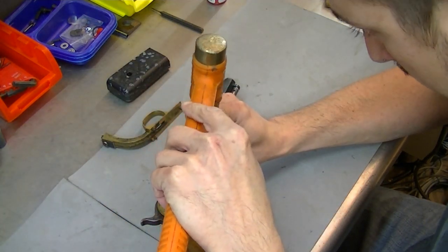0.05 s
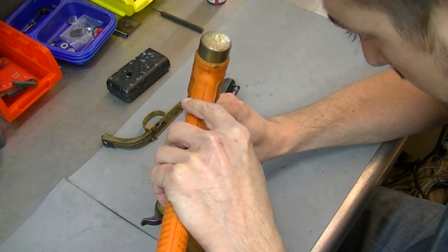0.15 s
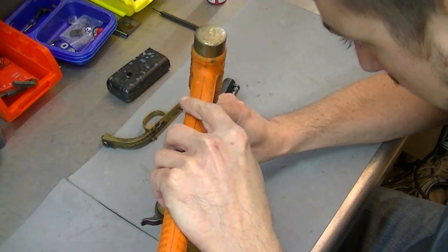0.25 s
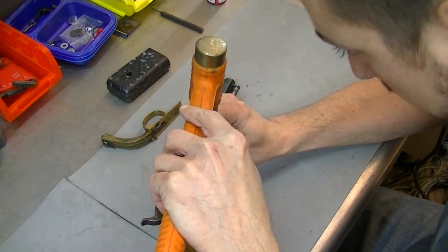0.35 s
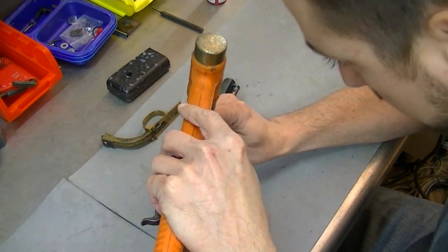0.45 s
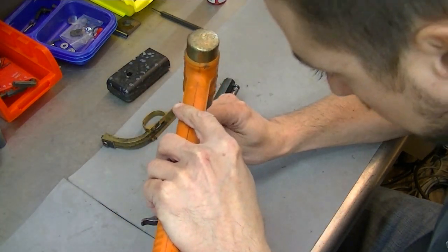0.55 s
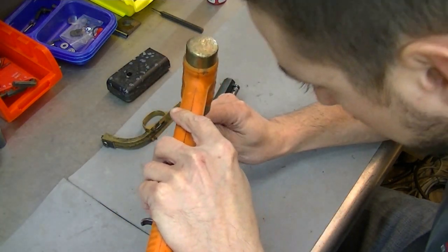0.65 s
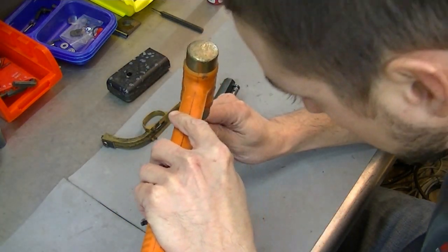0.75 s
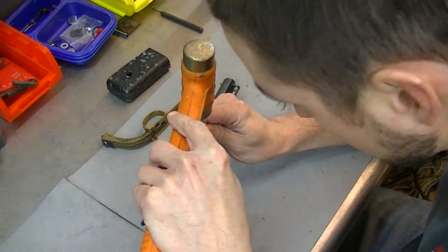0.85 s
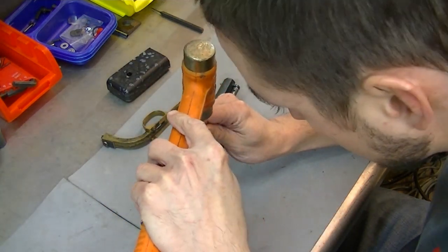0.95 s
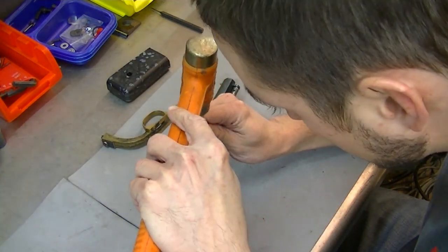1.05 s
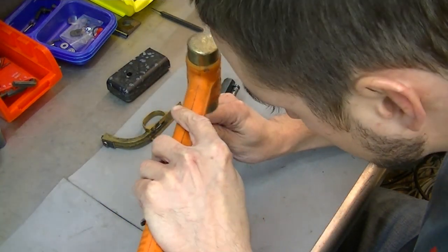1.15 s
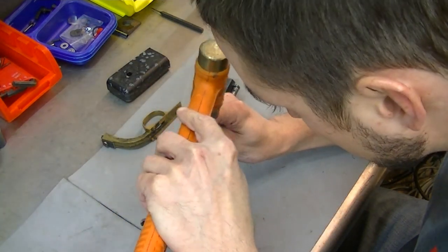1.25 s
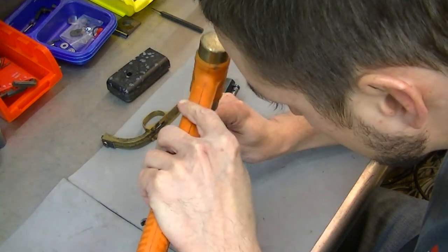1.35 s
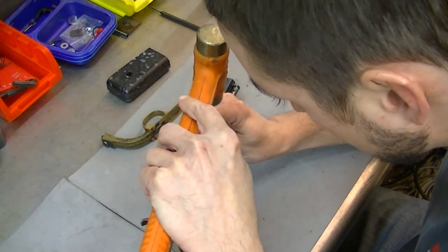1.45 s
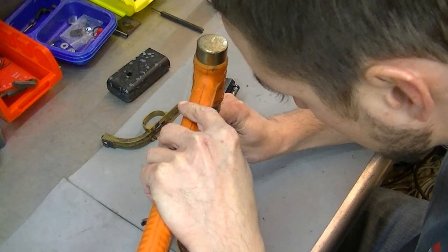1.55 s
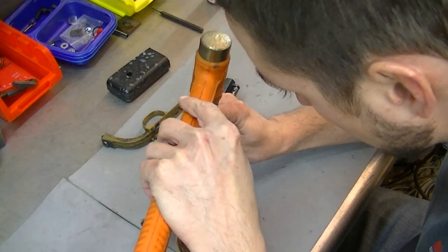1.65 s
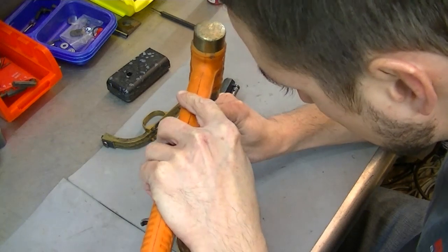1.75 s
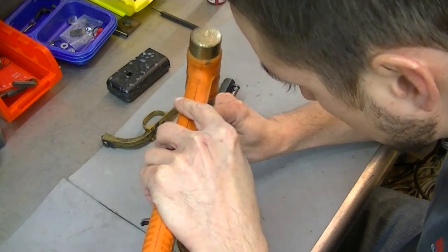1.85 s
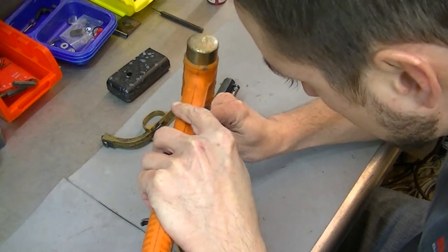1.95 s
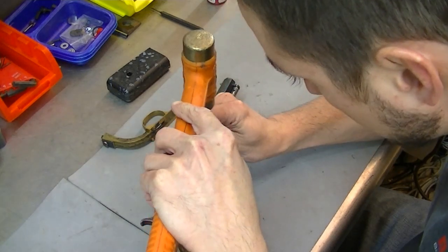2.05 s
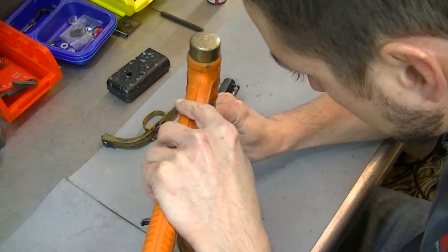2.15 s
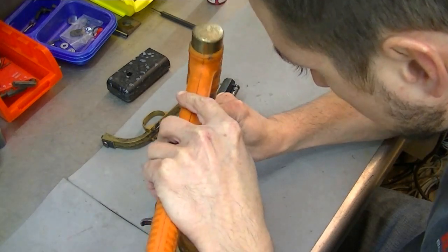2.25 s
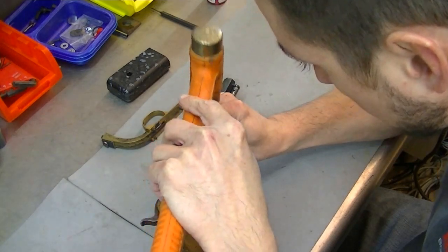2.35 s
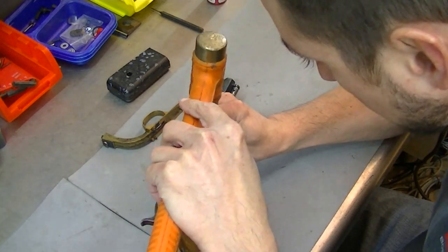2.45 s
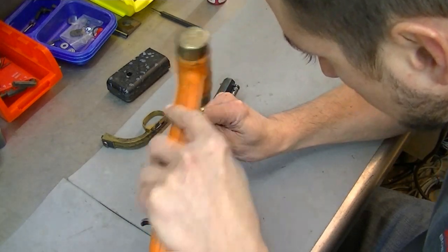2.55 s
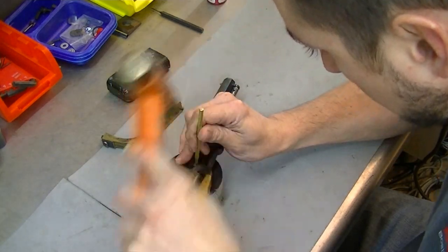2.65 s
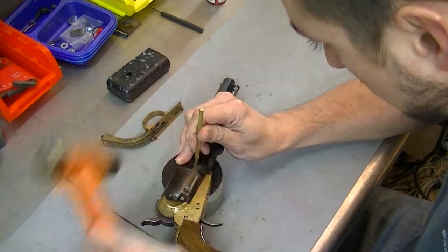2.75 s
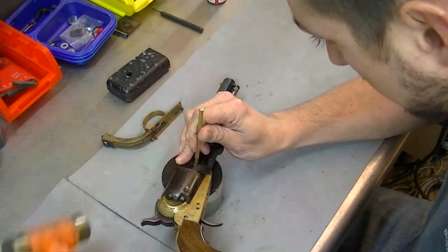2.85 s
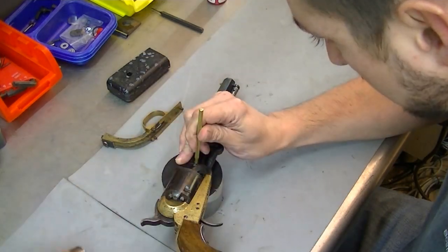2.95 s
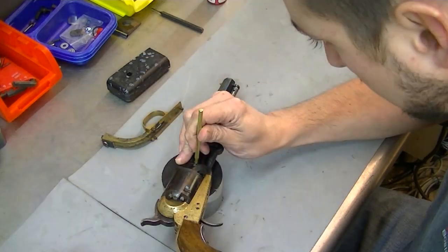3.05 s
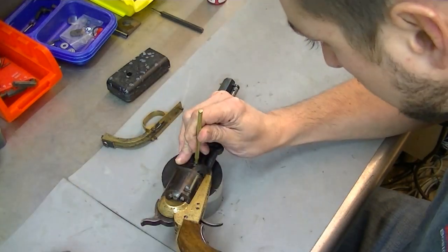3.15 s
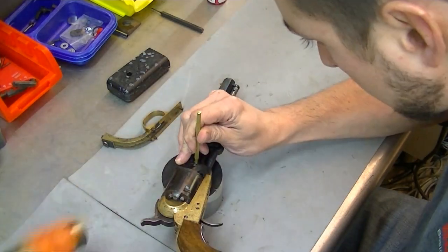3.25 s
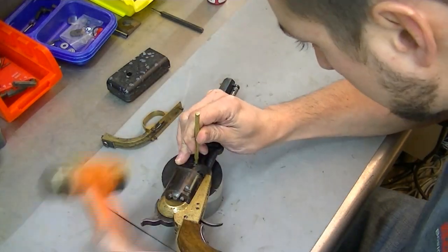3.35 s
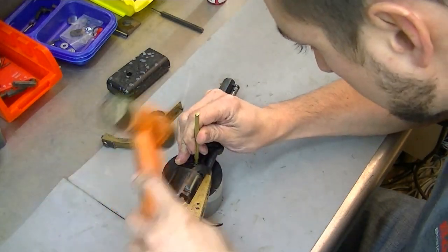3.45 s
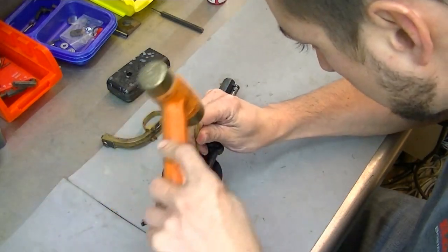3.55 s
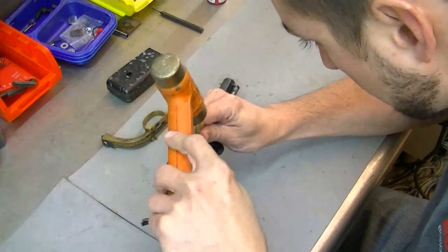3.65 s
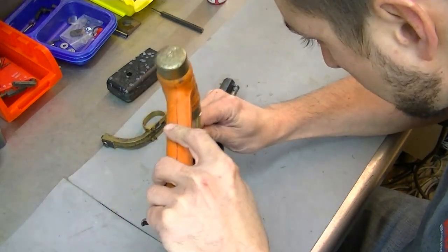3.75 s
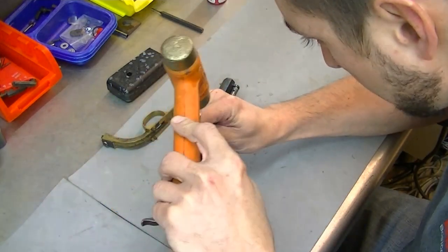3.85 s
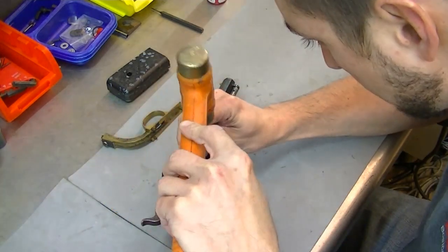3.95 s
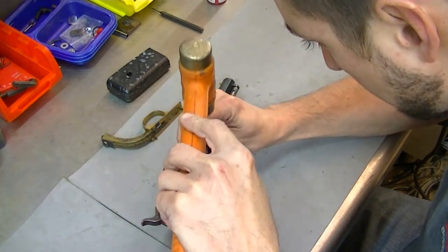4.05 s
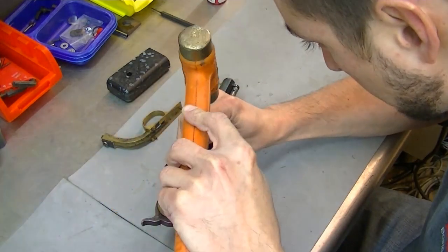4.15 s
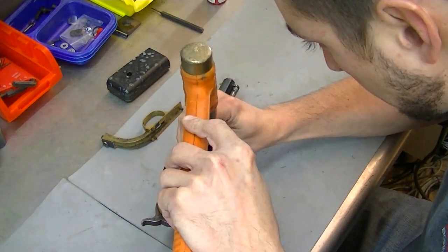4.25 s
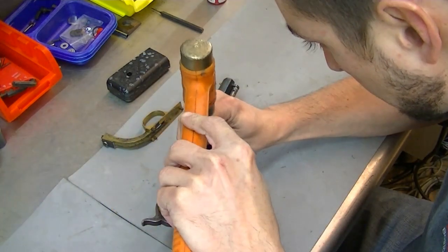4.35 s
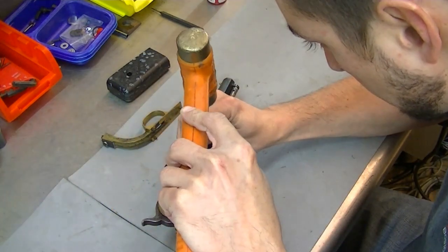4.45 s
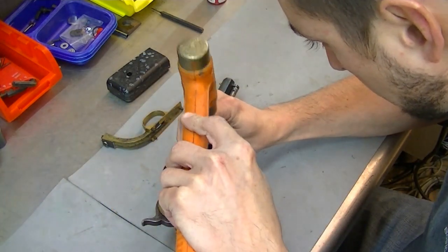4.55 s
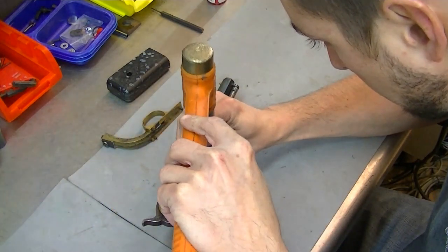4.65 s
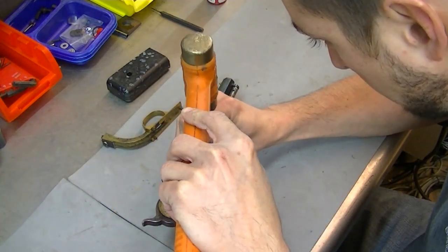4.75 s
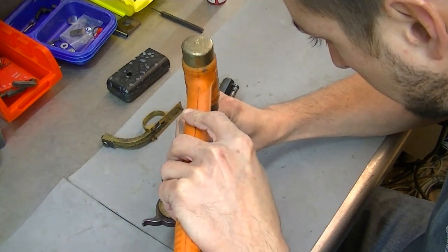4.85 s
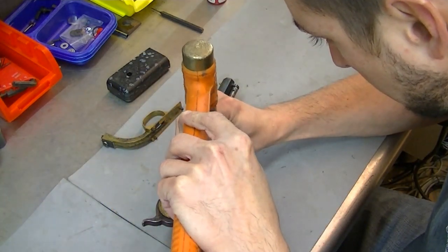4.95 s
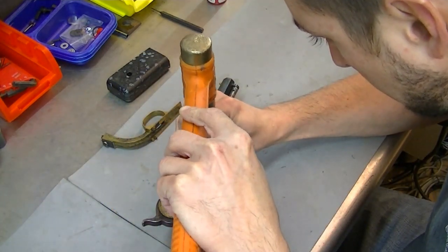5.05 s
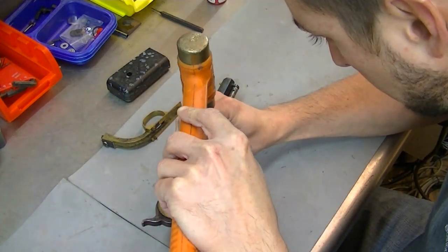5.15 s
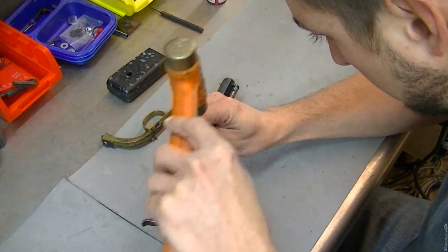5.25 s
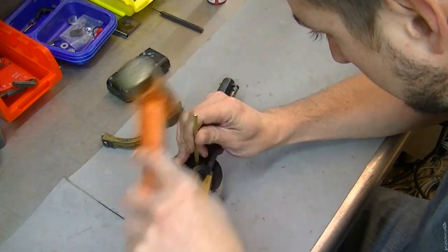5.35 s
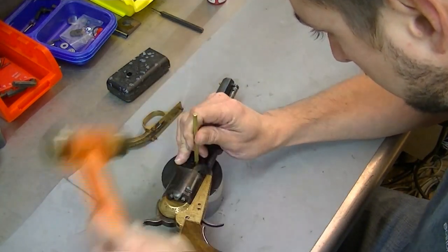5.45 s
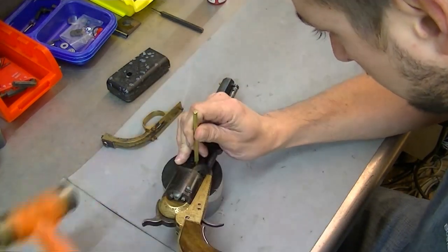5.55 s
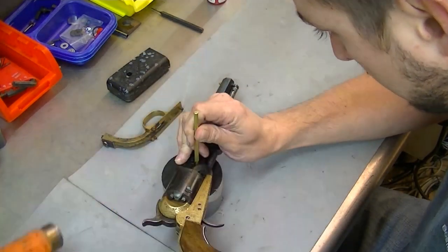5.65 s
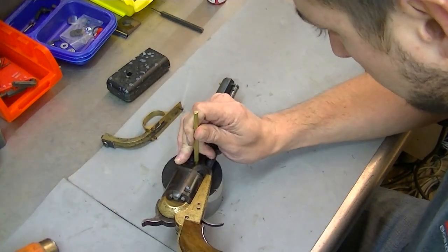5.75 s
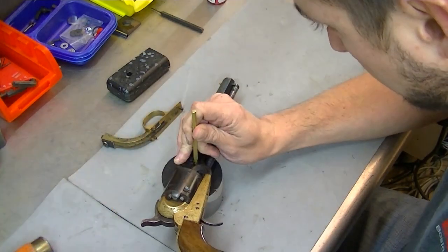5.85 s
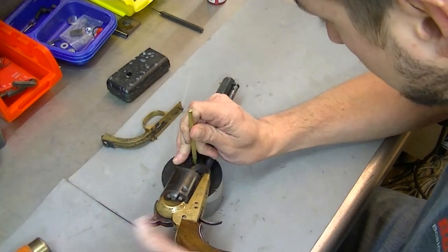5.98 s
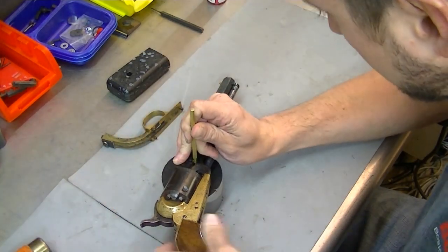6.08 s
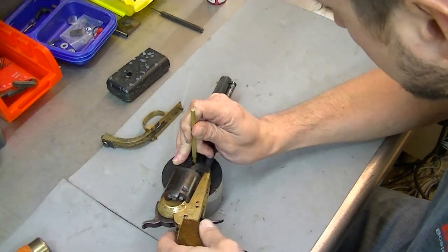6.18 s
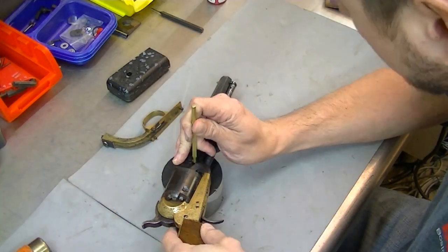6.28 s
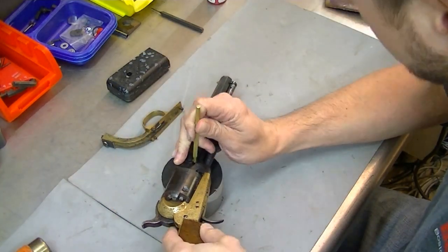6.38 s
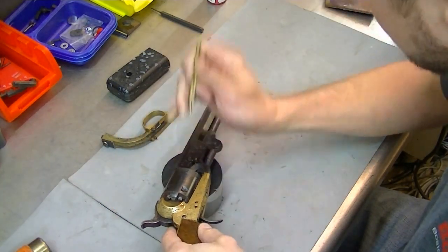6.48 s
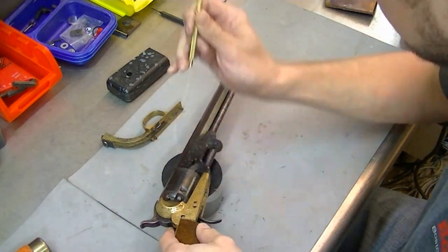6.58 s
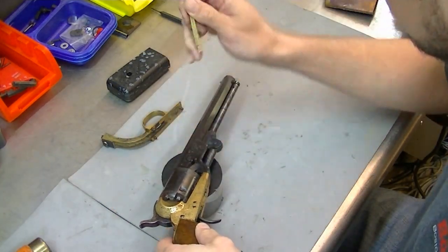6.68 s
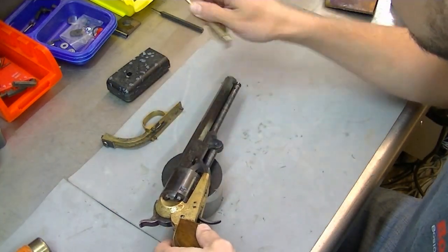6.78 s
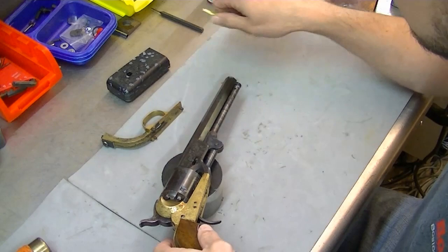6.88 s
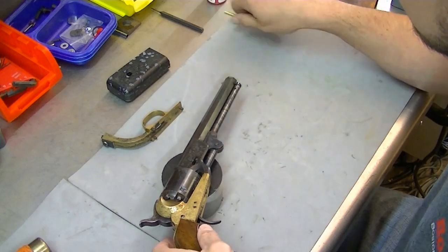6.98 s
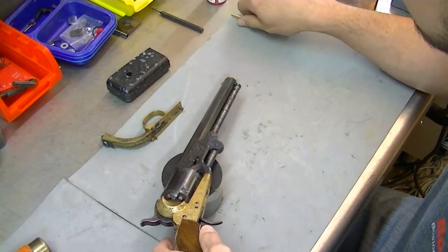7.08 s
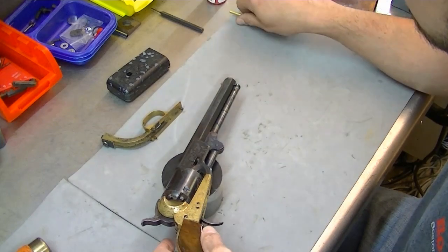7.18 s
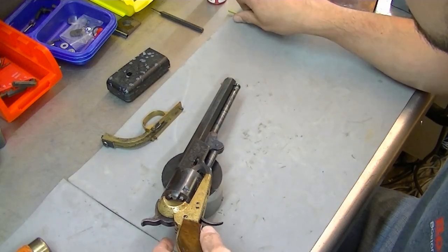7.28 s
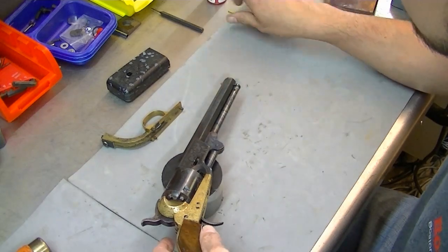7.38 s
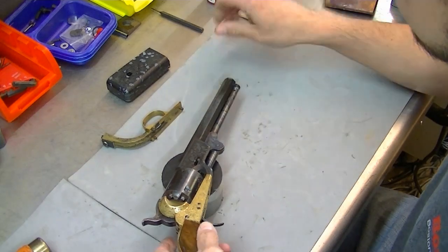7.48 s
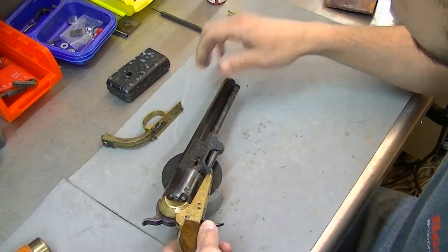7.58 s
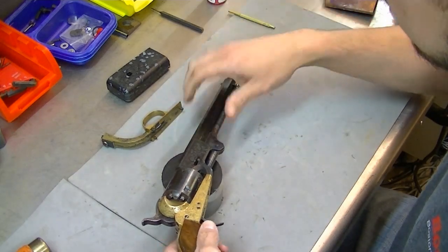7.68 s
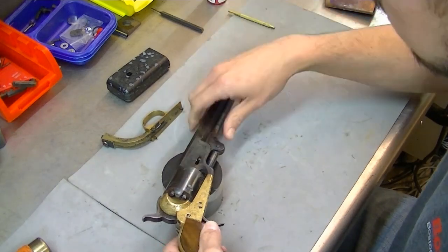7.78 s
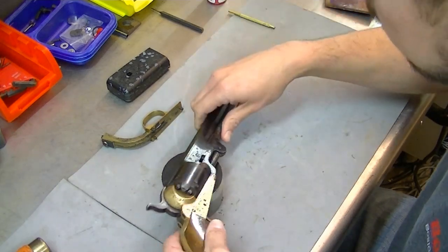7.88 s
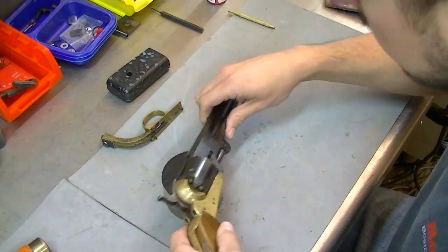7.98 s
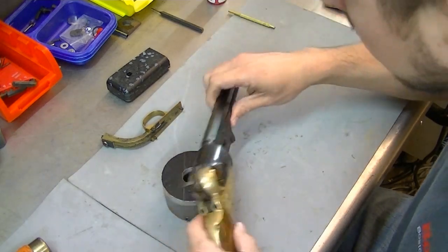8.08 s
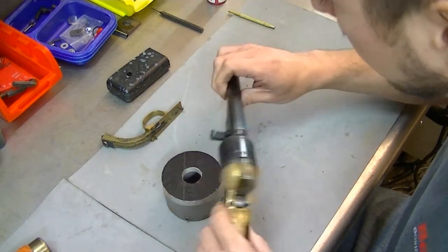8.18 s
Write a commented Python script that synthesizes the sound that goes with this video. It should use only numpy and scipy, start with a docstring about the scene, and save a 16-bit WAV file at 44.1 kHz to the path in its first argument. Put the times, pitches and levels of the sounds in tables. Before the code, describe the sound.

In a small, slightly echoing workshop, a hammer taps a brass punch held against a steel revolver. Each sharp metallic click has a brief ping and a woody bench thump, and loose parts often rattle after it. Seven uneven taps come first, then a pause and five more, mostly lighter. The hammer is put down with a clatter, and soft rubs and knocks follow. The sound is close, over faint hiss and lamp buzz.

```python
"""Sharp metallic clicks over a woody thump: a hammer drives a hand-held brass punch against a steel
revolver lying on a block on a workbench. Each blow rings the punch briefly, thumps the bench and makes
loose parts jump and bounce to rest. Then the hammer is put down with a clatter and the punch is laid
aside with soft rubs and knocks. The small workshop echoes, and a lamp buzzes faintly."""
import sys
import numpy as np
from scipy import signal
from scipy.fft import rfft, irfft
from scipy.io import wavfile
from scipy.ndimage import uniform_filter1d

SR = 44100
rng = np.random.default_rng(int(sys.argv[2]) if len(sys.argv) > 2 else 0)


def dump(signal):
    """Clip the signal to [-1, 1] and save it as 16-bit WAV at the path in sys.argv[1]."""
    limited = np.clip(np.atleast_2d(signal).T, -1, 1)
    pcm = np.round(limited * 32767).astype(np.int16)
    wavfile.write(sys.argv[1], SR, pcm)


N = 362502
T = np.arange(32768) / SR  # time axis of one hit or echo [s]

# Blows on the punch; at 4.65 s the revolver drops back on its block. Levels are before the mix.
# (time [s], click [dB], click tilt [dB/octave], low-pass [Hz], punch ring [dB], clack pitch [Hz],
#  clack [dB], frame ring [dB], knock pitch [Hz], knock [dB], bench thump [dB], rattle [dB])
HAMMER_BLOWS = [ (0.0599, -22.5, -1, 10300, -23, 3150, -34, -47, 548, -31, -33, -28),
                (0.389, -23, 2.5, 11400, -22, 3170, -29, -56, 558, -29, -30, -27),
                (0.9278, -33.5, -1.5, 9000, -37, 3080, -40, -51, 670, -33, -38.5, -47),
                (1.2521, -26, -1.5, 10900, -30, 3130, -37, -35, 778, -31.5, -35, -26.5),
                (1.5660, -20, 1.5, 11200, -21.5, 3330, -31, -35, 546, -32, -33.5, -24.5),
                (2.1364, -25, -0.5, 9200, -21, 3420, -28.5, -45, 585, -26.5, -30, -27.5),
                (2.4256, -21.5, 0.5, 12380, -31.5, 3350, -27, -33, 688, -37.5, -37.5, -28),
                (3.6672, -31, 1.5, 7000, -37.5, 4040, -40.5, -55, 745, -35, -44.5, -47),
                (4.0109, -28.5, -0.5, 13100, -34, 3310, -39, -44, 692, -41, -35.5, -33),
                (4.3000, -22, 3.5, 11600, -40, 3170, -33.5, -47, 714, -42, -39, -40),
                (4.6310, -25, 2.5, 13200, -51, 4260, -39, -62, 510, -64, -48.5, -44),
                (4.6547, -42, -0.5, 9100, -45, 2510, -53, -56, 455, -40.5, -43.5, -39.5),
                (4.9506, -29.5, 0, 12500, -32, 3100, -49, -53, 597, -28.5, -28.5, -26.5)]
def hammer_blows():
    """The sharp contact at the punch, then the slower answer of revolver, bench and everything loose."""
    contact, clacks, body = np.zeros((3, N))
    for (s, click_db, click_tilt_db, cutoff_hz, punch_db, clack_hz, clack_db,
         frame_db, knock_hz, knock_db, bench_db, rattle_db) in HAMMER_BLOWS:
        # a stiffer seat of the revolver gives a higher knock and a brighter thump
        thump_tilt_db = 22 * np.log2(knock_hz / 610)
        # a bigger rattle takes longer to swell
        swell_s = 0.011 * amp(rattle_db + 26) ** 0.27
        add(contact, s, amp(click_db) * low_pass(click(click_tilt_db), cutoff_hz))
        add(clacks, s + 0.0025, amp(clack_db) * clack(clack_hz))
        add(contact, s + 0.0021, amp(punch_db) * punch_ring())
        # the revolver's frame rings at one pitch, more on some blows than others
        add(body, s + 0.0012, amp(frame_db) * knock(hz=1194.5, t60=0.063))
        add(body, s + 0.001, amp(bench_db) * bench_thump(thump_tilt_db))
        # the mat under the block damps the knock almost at once
        add(body, s + 0.0015, amp(knock_db) * knock(knock_hz, t60=0.032))
        add(body, s + 0.0024, amp(rattle_db) * low_pass(rattle(swell_s, per_s=3000), cutoff_hz))
    return contact, clacks, body


# Tone of the hammer's click: (frequency [Hz], level [dB])
CLICK_EQ = [(30, -39), (100, -16.5), (250, -3.5), (600, 10.5), (1500, 6), (2500, 8), (4000, 0.5),
            (7000, -3), (10000, -9.5), (14500, -1)]
def click(tilt_db):
    """The attack of a blow: a snap of noise as hammer meets punch."""
    return crack(CLICK_EQ, decay_s=0.0008, tilt_db=tilt_db)


# Modes of the brass punch: (frequency [Hz], level [dB], t60 [s])
PUNCH_MODES = [(2944, -5.5, 0.04), (3134, -20, 0.027), (3100, -8.5, 0.097), (3162, -2.5, 0.073),
               (3272, -3.5, 0.036), (3392, -5.5, 0.037), (3930, -6, 0.011)]
def punch_ring():
    """The struck punch gives a brief, bright ping."""
    return ring(PUNCH_MODES, rise_s=0.0008)


def clack(hz, t60=0.022):
    """Punch on revolver, with one overtone; the grip sets the pitch and the fingers damp it fast."""
    return knock(hz, t60) + amp(-10) * knock(hz * 1.68, t60 / 2)


# Modes of the bench top: (frequency [Hz], level [dB], t60 [s])
BENCH_MODES = [(197, -20, 0.038), (258.6, -22, 0.12), (307, -17, 0.0648), (407, -8.5, 0.18),
               (439.4, 1, 0.1), (458, -8.5, 0.1), (476.2, -25, 1.0), (548, 15.5, 0.02), (613, -7, 0.088),
               (631, 8.5, 0.046), (757, 4, 0.047), (914.6, -9.5, 0.21), (934, -18.5, 0.024),
               (1138, 0, 0.037), (1340, -2.5, 0.014)]
# Tone of its dull push: (frequency [Hz], level [dB])
THUMP_EQ = [(30, -54), (80, -30.5), (140, -4.5), (250, -2.5), (500, 16), (800, -0.5), (1200, 9),
            (1700, -14), (3000, -30.5), (8000, -75.5)]
def bench_thump(tilt_db):
    """The weight under a blow: the bench top's modes and a dull push of noise."""
    modes = ring(BENCH_MODES, rise_s=0.0027, tilt_db=tilt_db)
    push = crack(THUMP_EQ, decay_s=0.0073, tilt_db=tilt_db)
    return amp(-1) * modes + amp(-3) * push


# Tone of small parts colliding: (frequency [Hz], level [dB])
CLATTER_EQ = [(30, 3.5), (80, -17), (160, -4), (300, 4), (600, 10.5), (1100, 5.5), (1600, 7.5), (2200, 7),
              (4000, 4.5), (6300, 1.5), (9000, -3.5), (11500, -11), (14500, -14.5)]
def rattle(swell_s, per_s, tilt_db=0, spread_db=3):
    """A swarm of tiny collisions that swells for swell_s and dies away."""
    age = T / swell_s
    size_db = spread_db * np.minimum(rng.exponential(1, len(T)), np.pi)
    polarity = rng.choice([-1, 1], len(T))
    clicks = amp(size_db) * polarity * (rng.random(len(T)) < per_s / SR)
    return burst(colour(clicks * age * np.exp(-age), CLATTER_EQ, tilt_db))


# Loose parts landing after the blows: (time [s], level [dB], tilt [dB/octave])
PART_LANDINGS = [ (0.4540, -37.5, -2.5), (1.314, -53, 3), (1.3459, -37.5, -1), (1.3752, -53, -2),
                 (1.5833, -25, 0.5), (1.6340, -28.5, -1), (1.6620, -32.5, 0), (1.7526, -39, -0.5),
                 (2.193, -36.5, -0.5), (2.4442, -26.5, 0), (2.4902, -33, 2), (2.5280, -38, 1),
                 (2.5510, -39, 1.5), (2.5879, -39.5, 0.5), (2.6140, -45, 0.5), (3.7210, -60, -7),
                 (4.0255, -30, 0), (4.0343, -31.5, -0.5), (4.075, -38.5, 2.5), (4.108, -38.5, 2),
                 (4.1380, -51, -0.5), (4.3390, -55, 3), (4.3646, -36, 1.5), (4.4070, -38.5, 0.5),
                 (4.4510, -53, -5), (4.6598, -37, -0.5), (4.6660, -36, -3.5), (4.7112, -55, -1),
                 (4.7407, -48, 2)]
# Modes of those parts: (frequency [Hz], level [dB], t60 [s])
PART_MODES = [(1292, -3, 0.041), (1440, -3, 0.057), (1980, 5.5, 0.047), (1975, -2, 0.04),
              (2995, 0.5, 0.058), (4040, -18, 0.28), (4264, 3, 0.043), (4540, -6.5, 0.105),
              (5070, -7, 0.056), (5916, -8, 0.04), (6000, -0.5, 0.037), (7400, -8, 0.08), (8370, -15, 0.14),
              (9400, -18.5, 0.041)]
def loose_parts():
    """Parts thrown up by a blow land again, each with a short clatter, a tick and a thin metal ring."""
    out = np.zeros(N)
    for s, db, tilt_db in PART_LANDINGS:
        ring_db = -35.5 + 0.65 * (db + 35)  # light landings are mostly ring, heavy ones mostly clatter
        add(out, s, amp(db) * rattle(swell_s=0.0053, per_s=5000, tilt_db=tilt_db, spread_db=0.5))
        add(out, s + 0.000978, amp(db - 6) * crack(CLATTER_EQ, decay_s=0.00048, tilt_db=tilt_db))
        add(out, s, amp(ring_db) * ring(PART_MODES, rise_s=0.0015))
    return out


# The hammer's head and handle meeting the bench: (time [s], level [dB], swell [s])
HAMMER_LANDINGS = [(5.945, -36.5, 0.0028), (5.9540, -22.5, 0.0058), (5.9760, -28, 0.012),
                   (6.0180, -27, 0.0047), (6.037, -37, 0.0037)]
def hammer_put_down():
    """The hammer lands on the bare bench top with a low knock and shakes the tools lying there."""
    out = np.zeros(N)
    for s, db, swell_s in HAMMER_LANDINGS:
        add(out, s, amp(db) * rattle(swell_s, per_s=4600, tilt_db=-0.4))
        add(out, s + 0.001, amp(db - 11.5) * bench_thump(tilt_db=4.5))
        add(out, s + 0.001, amp(db - 9.5) * knock(hz=303, t60=0.055))
    return out


# Fingers and metal sliding on the mat: (time [s], level [dB], swell [s], tilt [dB/octave])
MAT_RUBS = [(3.118, -72, 0.018, -4), (4.891, -71, 0.0018, 0), (5.817, -69, .0012, 1),
            (5.836, -60.5, 0.0074, -3.5), (5.8723, -58.5, 0.015, 9), (6.490, -74, 0.0035, 5),
            (7.091, -63, 0.016, 0), (7.27, -66.5, .028, 5), (7.343, -54, 0.008, -4),
            (7.858, -75, 0.0038, 9)]
# Light knocks of revolver and punch on the mat: (time [s], level [dB], pitch [Hz])
MAT_KNOCKS = [(5.3835, -67, 553), (5.8290, -64, 576), (5.8335, -62, 574), (6.4555, -54, 589),
              (7.344, -55.5, 422), (7.349, -65, 309), (7.3528, -61, 1200)]
def handling():
    """Soft, grainy rubs and muted knocks of metal on the mat."""
    out = np.zeros(N)
    for s, db, swell_s, tilt_db in MAT_RUBS:
        add(out, s, amp(db) * rattle(swell_s, per_s=5900, tilt_db=tilt_db, spread_db=-1.5))
    for s, db, hz in MAT_KNOCKS:
        grit = amp(-17) * rattle(swell_s=0.0033, per_s=4900)
        add(out, s, amp(db) * (knock(hz, t60=0.042) + grit))
    return out


def near_reflections(x, decay_s=0.0014, per_s=2500):
    """Quick reflections from the bench top, the bins and the worker's arms."""
    taps = rng.choice([-1., 1.], len(T)) * (rng.random(len(T)) < per_s / SR)
    taps *= np.exp(-T / decay_s) * (T > 0.001)
    return signal.fftconvolve(x, taps / np.linalg.norm(taps))[:N]


# Reverb time of the workshop: (frequency [Hz], t60 [s])
ROOM_DECAY = [(120, 1), (320, 0.74), (520, 0.22), (840, 0.49), (2200, 0.35), (5800, 0.324), (9000, 0.21),
              (14000, 0.064)]
def echo_tail(predelay_s, build_s, per_s=5000):
    """Dense reflections of a small room, each band dying at its own speed."""
    taps = rng.standard_normal(len(T)) * (rng.random(len(T)) < per_s / SR)
    hz, t, bands = signal.stft(taps, SR, nperseg=256)
    t60 = read(ROOM_DECAY, hz)[:, None]
    bands = bands * np.exp(-np.log(1000) * t / t60) / np.sqrt(t60)
    tail = signal.istft(bands, SR, nperseg=256)[1][:len(T)]
    swell = 1 - np.exp(-np.maximum(T - predelay_s, 0) / build_s)
    spectrum = rfft(tail * swell)
    # even out the random tail's spectrum so the echo sounds smooth and uncoloured
    spectrum /= np.sqrt(uniform_filter1d(abs(spectrum) ** 2, size=35) + 1e-20)
    tail = irfft(spectrum) * (T > predelay_s) * (T < 0.8 * T[-1])
    return tail / np.linalg.norm(tail)


# Standing waves of the workshop: (frequency [Hz], level [dB])
ROOM_RESONANCES = [(300, -12), (441, -12), (474, -6), (603, -9), (678, -13), (754, -12)]
def standing_waves(tail, width_hz=20):
    """The room favours a few low pitches and holds them longer."""
    return tail + sum(amp(db) * signal.lfilter(*signal.iirpeak(hz, hz / width_hz, fs=SR), tail)
                      for hz, db in ROOM_RESONANCES)


def room(x, predelay_s, build_s, crossfade_hz=0.4):
    """Workshop echo; three random tails crossfade, so no chance pitch rings on every hit."""
    turns = crossfade_hz * np.arange(N) / SR
    fades = np.maximum(np.cos(2 * np.pi * (turns - np.arange(3)[:, None] / 3)), 0)
    fades /= np.linalg.norm(fades, axis=0)
    return sum(signal.fftconvolve(x * fade, standing_waves(echo_tail(predelay_s, build_s)))[:N]
               for fade in fades)


# Tone of the side channel: (frequency [Hz], gain [dB])
SIDE_EQ = [(40, 3), (125, -9), (300, -19.5), (600, -18.5), (1200, -14), (2800, -13.5), (5500, -10),
           (9000, -7), (13000, 1)]
def stereo_spread(x):
    """Reflections that differ between left and right, widest in the deep bass and the top treble."""
    reflections = signal.fftconvolve(x, echo_tail(predelay_s=0.00017, build_s=0.0005))[:N]
    return colour(reflections, SIDE_EQ)


# Room tone: (frequency [Hz], level [dB])
AIR_EQ = [(15, -66), (25, -33.5), (368, -11.5), (534, -14), (594, -8), (661, -14), (1680, -14.5),
          (2080, -14.5), (2860, -15), (3180, -16.5), (3730, -14), (4260, -17), (4740, -18.5), (10800, -25),
          (14500, -32)]
def room_air():
    """A steady bed of soft noise, as mid and side."""
    mid, side = (colour(rng.standard_normal(N), AIR_EQ) for _ in range(2))
    gain = amp(-68.5) / mid.std()
    return gain * mid, gain * amp(-6.5) * side


# Partials of the lamp: (harmonic [multiple of twice the mains frequency], level [dB])
LAMP_HARMONICS = [(5, -73.5), (15, -88), (16, -79.5), (17, -76), (18, -81), (19, -82), (21, -87.5),
                  (22, -84.5), (24, -84), (25, -86), (26, -82), (27, -81.5), (29, -88), (35, -85),
                  (37, -86.5)]
def lamp_buzz(mains_hz=60.02):
    """A faint, steady buzz on harmonics of twice the mains frequency."""
    turns = 2 * mains_hz * np.arange(N) / SR
    return np.sqrt(2) * sum(amp(db) * np.sin(2 * np.pi * (k * turns + rng.random()))
                            for k, db in LAMP_HARMONICS)


def ring(modes, rise_s, tilt_db=0, scatter_db=1):
    """Dying sines; each hit shares its energy among them a little differently."""
    hz, db, t60 = np.transpose(modes)[:, :, None]
    db = db + tilt_db * np.log2(hz / hz.mean()) + scatter_db * rng.standard_normal(hz.shape)
    waves = np.sin(2 * np.pi * (hz * T + rng.random(hz.shape)))
    envelopes = amp(db) / hz * np.exp(-np.log(1000) * T / t60)
    speed = (waves * envelopes).sum(0) * (1 - np.exp(-T / rise_s)) ** 2
    # pressure follows the change of the surface's speed, so little sound lies below the modes
    return burst(np.gradient(speed))


def knock(hz, t60):
    """One damped resonance that builds up over its first cycle."""
    speed = np.sin(2 * np.pi * hz * T) * np.exp(-np.log(1000) * T / t60) * (1 - np.exp(-2 * hz * T))
    return burst(np.gradient(speed))


def crack(eq, decay_s, tilt_db):
    """A very short contact noise."""
    noise = rng.choice([-1., 1.], len(T)) * np.sqrt(T) * np.exp(-T / decay_s)
    return burst(colour(noise, eq, tilt_db))


def low_pass(x, cutoff_hz):
    """Steep low-pass that sets how bright or dull each blow's click and rattle sound."""
    return signal.sosfilt(signal.butter(8, cutoff_hz, fs=SR, output="sos"), x)


def colour(x, eq, tilt_db=0, size=4096):
    """Minimum-phase EQ, tilted by tilt_db an octave above 250 Hz."""
    hz = abs(np.fft.fftfreq(size, 1 / SR))
    octaves = np.log2(np.maximum(hz, 250) / 1000)
    log_gain = np.log(amp(read(eq, hz) + tilt_db * octaves))
    taps = np.fft.ifft(np.exp(np.conj(signal.hilbert(log_gain)))).real[:size // 2]
    return signal.oaconvolve(x, taps)[:len(x)]


def read(curve, hz):
    """A curve's value at hz, its points joined by straight lines on a log-frequency axis."""
    point_hz, value = np.transpose(curve)
    return np.interp(np.log(hz + 1), np.log(point_hz), value)


def amp(db):
    """Decibels to gain."""
    return 10 ** (np.asarray(db) / 20)


def burst(x):
    """Scales a short sound to the energy of 20 ms at full level."""
    return x * np.sqrt(SR / 50 / (np.sum(x ** 2) + 1e-20))


def add(mix, s, sound):
    """Mixes a sound in at time s."""
    part = mix[round(s * SR):][:len(sound)]
    part += sound[:len(part)]


def scene():
    """Direct sound in the middle; the wide bench top feeds the room more than the small metal parts do."""
    contact, clacks, body = hammer_blows()
    body += hammer_put_down()
    parts, touches = loose_parts(), handling()
    direct = (amp(-9) * contact + amp(-8) * near_reflections(contact) + amp(-2.5) * clacks
              + amp(-1.5) * body + amp(-4.5) * parts + amp(6) * touches)
    send = (amp(-11.3) * contact + amp(-18) * clacks
            + amp(-3) * body + amp(-9) * parts + amp(1.5) * touches)
    air_mid, air_side = room_air()
    mid = direct + air_mid + lamp_buzz() + room(send, predelay_s=0.0065, build_s=0.0023)
    side = stereo_spread(send + amp(-13) * contact) + air_side
    return np.array([mid + side, mid - side])


# Balance of the microphone pair: (frequency [Hz], left minus right [dB])
MIC_BALANCE = [(100, -0.5), (600, 0.5), (1200, -0.6), (5000, 1), (9000, 0.5), (13000, -2.5)]
def record(dry, low_cut_hz=118, high_cut_hz=14700):
    """Two slightly unlike microphones with a bass cut, then a steep treble cut."""
    half_db = read(MIC_BALANCE, np.fft.rfftfreq(N, 1 / SR)) / 2
    heard = irfft(rfft(dry) * amp([half_db, -half_db]), N)
    low_cut = signal.butter(3, low_cut_hz, "high", fs=SR, output="sos")
    heard = signal.sosfilt(low_cut, heard) + amp(-39) * heard  # a trace of deep bass gets through
    high_cut = signal.firwin(401, high_cut_hz, window=("kaiser", 9), fs=SR)
    return signal.oaconvolve(heard, high_cut[None], "same")


dry = scene()
out = record(dry)
dump(out)
```